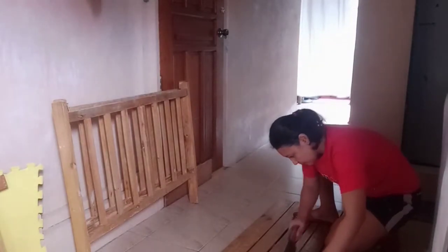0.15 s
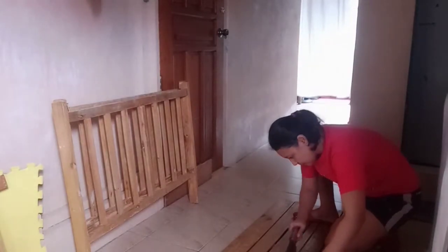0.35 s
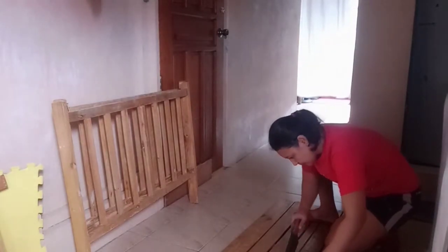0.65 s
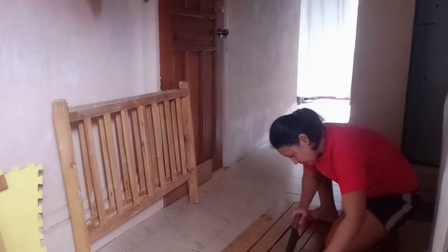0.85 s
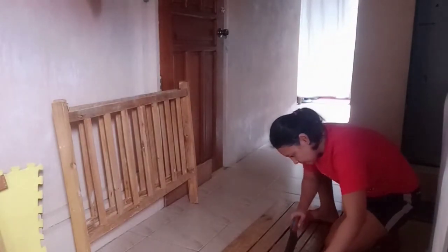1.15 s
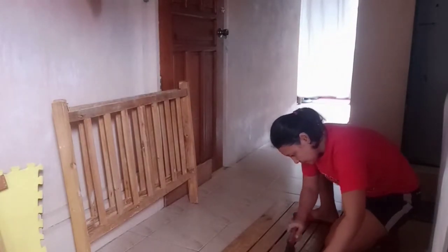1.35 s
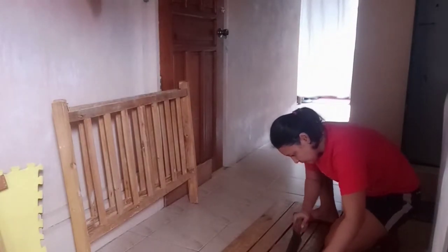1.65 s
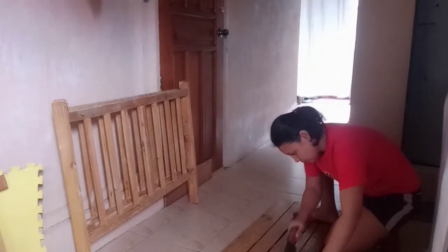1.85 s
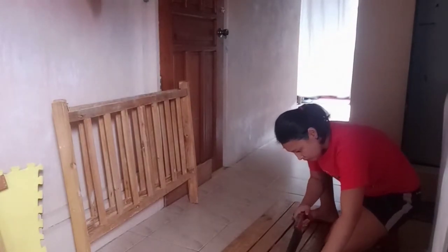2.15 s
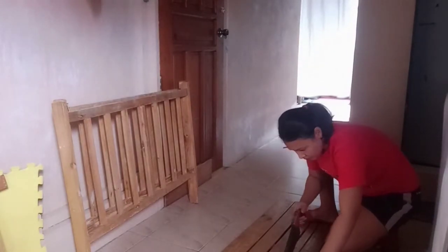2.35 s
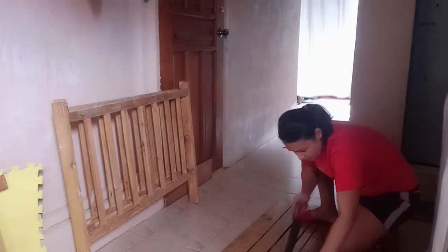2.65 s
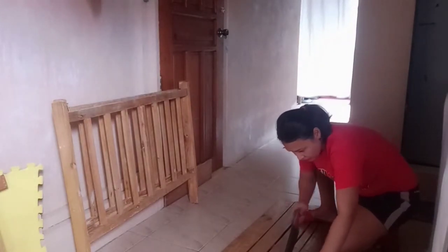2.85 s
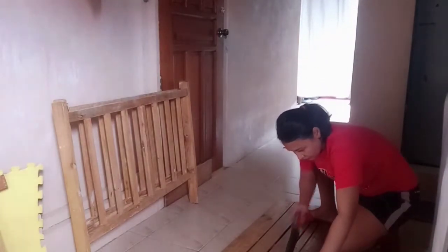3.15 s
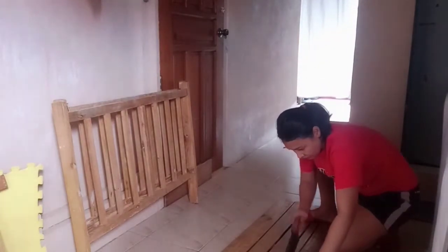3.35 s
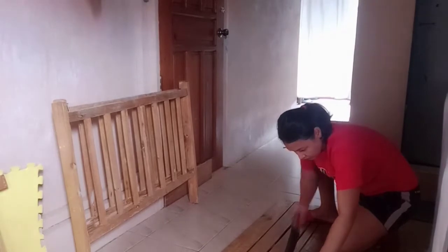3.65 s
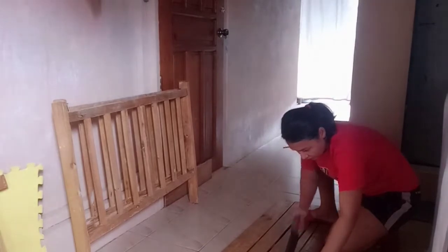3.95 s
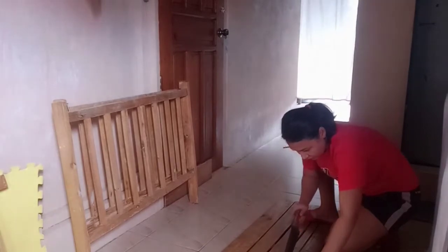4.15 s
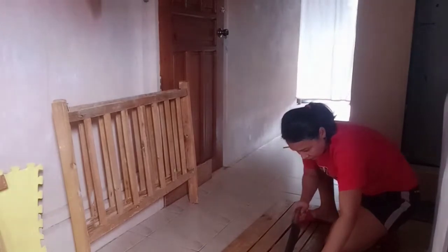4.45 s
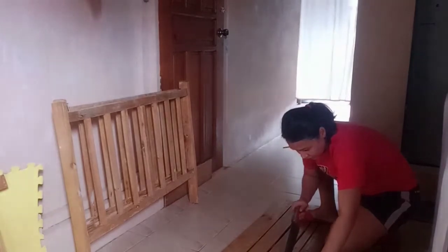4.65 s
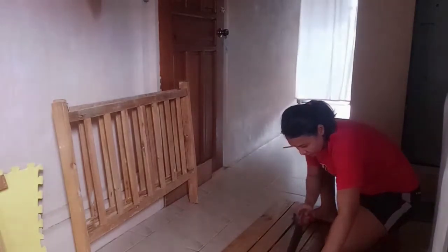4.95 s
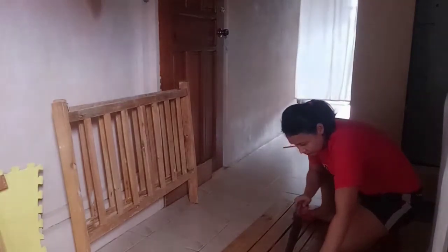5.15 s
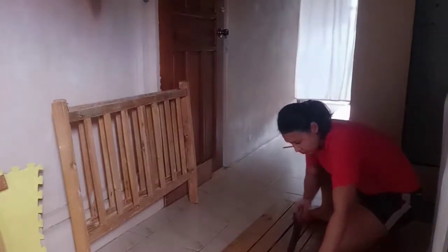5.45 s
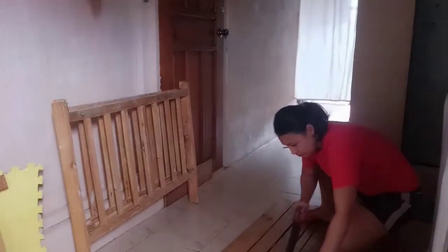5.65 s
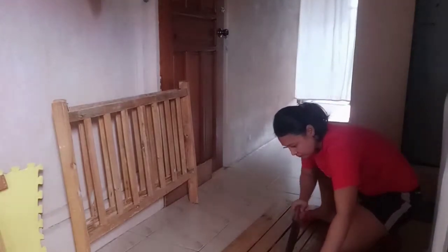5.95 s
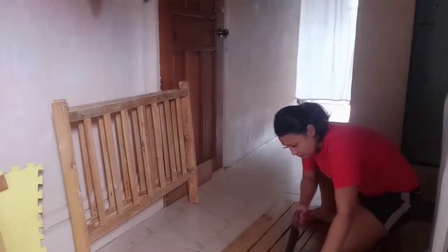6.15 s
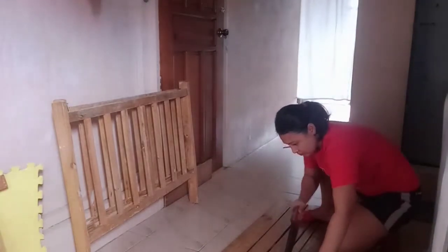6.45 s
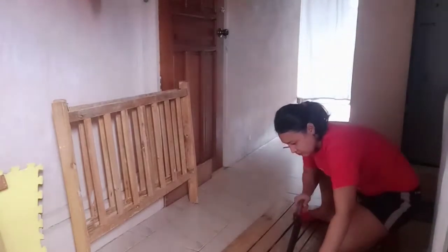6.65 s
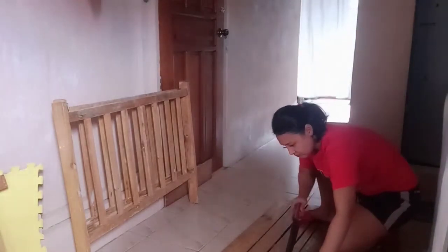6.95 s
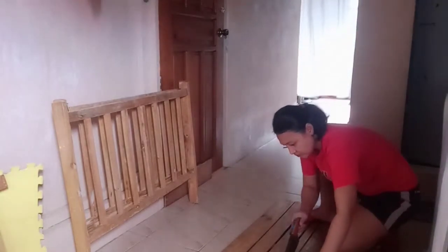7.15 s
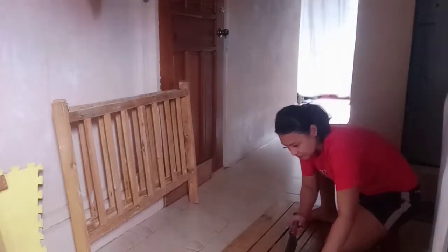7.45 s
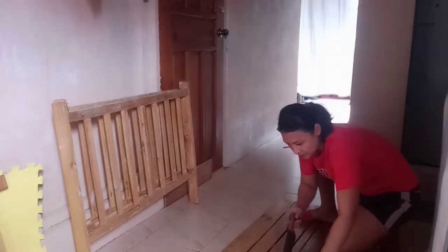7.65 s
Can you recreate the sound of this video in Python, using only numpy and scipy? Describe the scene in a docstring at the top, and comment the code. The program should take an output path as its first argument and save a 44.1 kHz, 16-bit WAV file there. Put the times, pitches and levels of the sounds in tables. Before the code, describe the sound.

Fast, dry hand sawing on wood, about six strokes a second, stops and restarts in a hard-walled hallway, ending in near silence.

```python
"""From the start a hand saw works to and fro through a wooden slat on a tiled hallway floor, about six
strokes a second, with pauses; its teeth snap fibres and shake frame, slat and blade, and echoes follow.
A draught, lumpy low noise, is there from the start, buffets the microphone hard from 1.3 to 2.7 s and dies by 3.2 s.
From 2 s narrow noise bands whistle faintly in the pauses; they are strong as the blade sings near 7.1 s.
A quiet house hushes throughout; a faint hiss is all that differs between the channels."""
import sys
import numpy as np
from scipy import signal
from scipy.fft import rfft, irfft
from scipy.io import wavfile
from scipy.ndimage import uniform_filter1d

SR = 44100
rng = np.random.default_rng(int(sys.argv[2]) if len(sys.argv) > 2 else 0)


def volts_from_db(level):
    """Convert decibel levels to linear amplitude ratios."""
    exponent = np.asarray(level, float) / 20
    return 10 ** exponent


def store_pcm(level_fs):
    """Save levels as 16-bit WAV."""
    pcm = np.round(np.clip(level_fs, -1, 1) * 32767).astype(np.int16)
    wavfile.write(sys.argv[1], SR, np.atleast_2d(pcm).T)


N = 343978
STEP_S = 0.002  # grid of the stroke envelopes


def evened(x):
    """Scales to rms 1."""
    return x / np.sqrt(np.mean(x ** 2) + 1e-20)


def curve(rows, column):
    """One column of a table, at every sample."""
    rows = np.asarray(rows)
    return np.interp(np.arange(N) / SR, rows[:, 0], rows[:, column])


def stretched(values):
    """From steps of STEP_S to samples."""
    return np.interp(np.arange(N) / SR, np.arange(len(values)) * STEP_S, values)


def wander(hz):
    """Low-passed noise of rms 1: slow chance."""
    return evened(signal.sosfilt(signal.butter(2, hz, fs=SR, output="sos"), rng.standard_normal(N)))


def body(points, band_hz, rings=()):
    """Minimum-phase response of a colour with resonances; white noise comes out at rms 1 within the band."""
    hz = np.fft.rfftfreq(8192, 1 / SR)
    point_hz, point_db = np.transpose(points)
    db = np.interp(np.log(hz + 1), np.log(point_hz + 1), point_db)
    for centre_hz, width_hz, lift_db in rings:
        db = db + lift_db / (1 + (2 * (hz - centre_hz) / width_hz) ** 2)
    # folding the cepstrum makes the response causal
    cepstrum = irfft(np.log(volts_from_db(np.maximum(db, -100))))
    cepstrum[1:4096] *= 2
    cepstrum[4097:] = 0
    response = np.exp(rfft(cepstrum))
    inside = (hz > band_hz[0]) & (hz < band_hz[1])
    return irfft(response) / np.sqrt(np.sum(abs(response[inside]) ** 2) / len(hz))


def coloured(x, points, band_hz, rings=()):
    """Filters a signal through a body."""
    return signal.oaconvolve(x, body(points, band_hz, rings))[:N]


# swells of sawing, mostly firm and lighter strokes, also faint tails and overlapping parts of strokes:
# full_force_s, swell_ms (from rest), fade_ms (by 20 dB at depth 1), force_db, scrape_db (blade re force)
STROKE_ROWS = [(0.071, 197, 96.5, -19.5, -10.5), (0.21, 119, 84.5, -22.5, -8),
               (0.377, 137, 91.5, -23, -9.5), (0.545, 191, 91, -28, -7), (0.693, 85, 114, -20, -11),
               (0.843, 99, 129, -26, -7.5), (1.004, 101, 116, -20, -11.5), (1.158, 140, 113.5, -27.0, -6.5),
               (1.342, 118, 88.5, -21, -11.5), (1.508, 152, 104.5, -26.5, -7),
               (1.624, 29, 94.5, -39.5, -2.5), (1.73, 58.5, 128, -19.5, -8.5), (1.911, 118, 112, -29.5, -5),
               (2.042, 45, 64.5, -60.5, 8), (2.208, 84, 61.5, -51.5, -2.5), (2.312, 97, 75, -59, 0),
               (2.569, 172, 86.5, -41, -3.5), (2.568, 68, 25, -41, -16.0), (2.72, 82, 138.5, -21, -6.5),
               (2.883, 71, 118.5, -26.0, -4), (3.039, 89, 118.5, -19.5, -9), (3.228, 146, 84, -24.5, -7),
               (3.361, 95, 128.5, -22.5, -6.0), (3.586, 149, 73, -28, -4), (3.694, 81, 122, -20, -7),
               (3.863, 150, 93.5, -28.5, -7.0), (4.013, 110, 96, -23, -6.5), (4.167, 114, 157.5, -29, -4),
               (4.305, 81, 90, -21.5, -6.5), (4.465, 152, 117.5, -32.0, -2.5), (4.795, 153, 57.5, -55.5, 8),
               (4.965, 64, 89, -42.5, 1.5), (5.126, 110, 101.5, -39, -3.5), (5.509, 91, 123.5, -23, -5.5),
               (5.683, 132, 82, -32.5, -5), (5.782, 71, 107, -25.5, -4.5), (5.979, 153, 101, -34.5, -3.0),
               (6.066, 64, 132.5, -24.5, -5.0), (6.204, 68, 132.5, -31, -2.5), (6.562, 140, 206, -60.5, 8),
               (6.609, 103, 87.5, -36, -3), (6.766, 118, 103.5, -21.0, -6.5),
               (6.944, 125, 110, -30.5, -3.5), (7.098, 135, 164, -25, 0), (7.194, 39, 120, -30.5, 5),
               (7.378, 28, 167, -64.5, -1), (7.578, 210, 217.5, -63, -14.5), (7.777, 27, 106.5, -70, 13)]
SWELL_POWER, FADE_POWER = 2.9, 1.43
BITE_SHARE, BITE_MS = 0.74, 2.5  # teeth bite with this share of the swell left, within BITE_MS
BITE_DB = -37  # lighter strokes slide in without biting


def strokes(offset_db=0., shift_s=0., depth=0.69, late=0.93):
    """Power of every stroke per step, and its phase: -1 at rest, 0 at full force, 1 after fade_ms."""
    full_s, swell_ms, fade_ms, force_db = np.transpose(STROKE_ROWS)[:4]
    late_ms = 1000 * (np.arange(0, N / SR, STEP_S)[:, None] - full_s - shift_s)
    phase = np.where(late_ms < 0, late_ms / np.maximum(swell_ms, 10), late_ms / np.maximum(fade_ms, 10))
    swell = np.maximum(1 - np.minimum(phase, 0) ** 2, 0) ** (depth * late * SWELL_POWER)
    since_bite_ms = late_ms + 1000 * shift_s + BITE_SHARE * swell_ms
    swell = swell * np.clip(since_bite_ms / BITE_MS, force_db < BITE_DB, 1)
    fade_db = -20 * depth * np.maximum(phase, 0) ** FADE_POWER
    return (swell * volts_from_db(force_db + offset_db + fade_db)) ** 2 + 1e-14, phase


def stroke_db(offset_db=0., shift_s=0., depth=1., late=1.):
    """Level of all strokes together: their powers add."""
    return stretched(10 * np.log10(strokes(offset_db, shift_s, depth, late)[0].sum(1)))


def teeth(per_s, spread_db, rasp, judder_db):
    """Fibres snapping at uneven moments over the rasp of dust, with the blade juddering in the cut."""
    snaps = (rng.random(N) < per_s / SR) * rng.choice([-1., 1.], N)
    snaps = snaps * volts_from_db(spread_db * np.minimum(rng.exponential(1, N), 4))
    rasp = np.clip(rasp, 0, 1)
    mix = np.sqrt(1 - rasp) * evened(snaps) + np.sqrt(rasp) * rng.standard_normal(N)
    return evened(mix * volts_from_db(judder_db * wander(54.0)))


def uneven(x, force_db, loud_db=2.0, quiet_db=7.5):
    """Random patches in time and pitch make the colour uneven, more so in quiet moments."""
    z = signal.stft(x, nperseg=1024, noverlap=768)[2]
    field = rng.standard_normal(z.T.shape).T
    field = uniform_filter1d(field, size=4, axis=0)
    field = evened(uniform_filter1d(field, size=9, axis=1))
    force_db = np.interp(np.arange(z.shape[1]) * 256, np.arange(N), force_db)
    depth_db = np.interp(force_db, [-60, -35], [quiet_db, loud_db])
    gain = volts_from_db(depth_db * field)
    gain /= np.sqrt(np.mean(gain ** 2, axis=0))
    return signal.istft(z * gain, nperseg=1024, noverlap=768)[1][:N]


FIRM_DB, FRAME_LOSS = -29.5, 0.97  # below this force, dB lost per dB
SKIM_DB, SKIM_LOSS = 1, 3.  # a blade scraping brighter than this only skims: dB lost per dB


def drumming_db():
    """Level offset per stroke: a light or skimming stroke shakes the frame less."""
    force_db, scrape_db = np.transpose(STROKE_ROWS)[3:]
    return FRAME_LOSS * np.minimum(force_db - FIRM_DB, 0) - SKIM_LOSS * np.maximum(scrape_db - SKIM_DB, 0)


# ringing of wood and steel above the broad colour, shared by frame, slat and blade: centre_hz, width_hz, lift_db
RING_ROWS = [(279.6, 75, 5), (376, 110, 1.5), (473, 93, 1.5), (696, 76, 0.5), (994, 49, 2), (1094, 21, 7.5),
             (1404, 50, 2), (1522, 23, 7.5), (1720, 33, 3), (2187, 43, -11), (2387, 82, 4), (3290, 29, 5),
             (3480, 25, 7), (3622, 30, 5.5), (3793, 42, 7), (5550, 120, 1.5), (6700, 45, -2.5),
             (7900, 120, 2.5)]
# how firmly the slat is pressed down: time_s, drumming_db (frame re force), thud_db (floor re drumming)
SEATING_ROWS = [(0.0, -7.5, -15), (.8, -7.5, -22), (1.5, -5, -15), (2.7, -7.5, -31), (3.3, -8.5, -13.5),
                (3.9, -6.5, -14.5), (4.3, -4.5, -14), (5.0, -4.5, -13), (5.5, -8.5, -13), (6.2, -6.5, -9),
                (6.7, -10, -19), (7.1, -10.5, -22.5), (7.8, -13.5, -16)]
# colour of the frame: pitch_hz, density_db (relative, per Hz)
FRAME_COLOUR = [(53, -57.5), (90, -19.5), (182, -5), (241, -10), (280, -2), (316, -8.5), (370, 3), (448, 1),
                (650, -4.5), (840, -22.5), (1430, -120)]


def frame(coarse):
    """The teeth drum the frame, lagging the stroke."""
    level_db = stroke_db(drumming_db(), shift_s=0.0085, depth=1., late=0.98) + curve(SEATING_ROWS, 1)
    return coloured(coarse * volts_from_db(level_db), FRAME_COLOUR, (230, 600), RING_ROWS)


CHATTER_HZ, LIGHT_HZ_PER_DB = 948, 19.5  # light strokes chatter higher
PUSH_DB, SAG_HZ_PER_DB = -27, 29  # firmer strokes sag in pitch as they go, lighter ones climb


def chatter_hz():
    """Pitch of the passing teeth: mean over strokes, weighted by their power."""
    power, phase = strokes()
    force_db = np.transpose(STROKE_ROWS)[3]
    sag_hz = SAG_HZ_PER_DB * np.clip(force_db - PUSH_DB, -8, 8) * np.clip(phase, -1, 1)
    hz = CHATTER_HZ + LIGHT_HZ_PER_DB * (-21.5 - force_db) - sag_hz
    return stretched((power * hz).sum(1) / power.sum(1))


def glide(x, hz, width_hz):
    """A resonance that follows the curve hz: shift down to zero, smooth, shift back."""
    turn = np.exp(2j * np.pi * np.cumsum(hz) / SR)
    r = np.exp(-np.pi * width_hz / SR)
    return 2 * (turn * signal.lfilter([1 - r], [1, -r], x / turn)).real


def chatter(coarse, force_db):
    """Passing teeth: a resonance whose pitch moves with each stroke."""
    return evened(glide(coarse, chatter_hz(), width_hz=300.)) * volts_from_db(force_db - 17.5)


# colour of the slat: pitch_hz, density_db (relative, per Hz)
SLAT_COLOUR = [(350, -41.5), (600, -11), (714, -2), (1080, -2.5), (1390, -7), (1740, -4.5), (2300, -19),
               (2990, -36), (5060, -120)]


def slat(coarse, force_db, bites):
    """Teeth and catches ring the wooden slat."""
    level = volts_from_db(force_db - 0.03) + volts_from_db(-7.0) * bites
    return coloured(coarse * level, SLAT_COLOUR, (650, 2000), RING_ROWS)


# colour of the steel blade: pitch_hz, density_db (relative, per Hz)
BLADE_COLOUR = [(1290, -25), (2200, 0), (2410, -1.5), (2590, -4), (2790, -3.5), (3700, -3), (4890, -11.5),
                (7380, -12.5), (7820, -14.5), (9220, -33), (11300, -29.5), (12700, -20), (14900, -13),
                (15800, -14)]


def blade(fine, bites):
    """Fine teeth noise rings the steel; it leads the stroke and dips less at the turns."""
    scrape_db = np.transpose(STROKE_ROWS)[4]
    scrape = volts_from_db(stroke_db(scrape_db, shift_s=-.006, depth=0.93)) + bites
    sizzle = signal.sosfilt(signal.butter(4, 11800., "high", fs=SR, output="sos"), fine)
    sizzle_gain = np.clip(scrape / 0.016, .01, 3) ** -.1 - 1  # light strokes keep more of the top
    return coloured(scrape * (fine + sizzle * sizzle_gain), BLADE_COLOUR, (2600, 8000), RING_ROWS)


# teeth catching at the start of a stroke: start_s, level_db (at onset)
CATCH_ROWS = [(.187, -55), (0.638, -48), (0.665, -41), (.926, -38), (.959, -37), (1.093, -45), (1.275, -50),
              (1.435, -52), (1.603, -45), (1.699, -48), (2.158, -54), (2.477, -53), (2.656, -29.5),
              (2.84, -44), (3, -33), (3.201, -52), (3.318, -35), (3.542, -30), (3.648, -45), (3.94, -36),
              (4.004, -53), (4.09, -44), (4.277, -53), (4.711, -68), (4.921, -70), (5.451, -48),
              (5.749, -47), (5.978, -35.5), (6.697, -50), (6.913, -45), (6.994, -30.5), (7.039, -17),
              (7.077, -24), (7.188, -32), (7.757, -69)]


def catches():
    """Envelope of tearing bursts: instant onset, 60 dB decay in 55 ms."""
    train = np.zeros(N)
    for start_s, level_db in CATCH_ROWS:
        train[round(start_s * SR)] = volts_from_db(level_db)
    t = np.arange(4000) / SR
    return signal.oaconvolve(train, volts_from_db(-60 * t / 0.055))[:N]


def saw():
    """The same teeth shake the frame, the slat and the blade, each with its own colour."""
    force_db = stroke_db()
    coarse = uneven(teeth(per_s=700., spread_db=2.0, rasp=0.47, judder_db=0.5), force_db)
    fine = uneven(teeth(per_s=2300.0, spread_db=2.5, rasp=0.61, judder_db=2.0), force_db)
    fine = evened(0.63 * coarse + 0.78 * fine)
    bites = catches()
    return frame(coarse) + chatter(coarse, force_db) + slat(coarse, force_db, bites) + blade(fine, bites)


def hallway(x, t60_low_s=0.15, t60_high_s=0.1, split_hz=2060.0):
    """Sparse echoes of random sign between hard walls; the treble dies first."""
    taps = np.zeros(SR // 2)
    at = np.arange(200, len(taps) - 20, 20)
    taps[at + rng.integers(0, 20, len(at))] = rng.choice([-1., 1.], len(at))
    low = signal.sosfilt(signal.butter(2, split_hz, fs=SR, output="sos"), taps)
    t = np.arange(len(taps)) / SR
    tail = low * volts_from_db(-60 * t / t60_low_s) + (taps - low) * volts_from_db(-60 * t / t60_high_s)
    return signal.oaconvolve(x, tail / np.linalg.norm(tail))[:N]


def thud_db():
    """Level of the floor thudding after the strokes, less for lighter ones."""
    force_db = np.transpose(STROKE_ROWS)[3]
    offset_db = drumming_db() + .4 * (force_db + 20)
    level_db = stroke_db(offset_db, shift_s=.025, depth=1.6, late=2.6)
    return level_db + curve(SEATING_ROWS, 1) + curve(SEATING_ROWS, 2)


# draught on the microphone: time_s, level_db
DRAUGHT_ROWS = [(0.0, -50), (.12, -40), (.5, -63), (.67, -47), (1.05, -38.5), (1.27, -53), (1.34, -40),
                (1.58, -31.5), (1.65, -46), (1.7, -30.5), (2.0, -35), (2.19, -52), (2.38, -43), (2.45, -51),
                (2.67, -31), (2.78, -43), (3.08, -59), (3.15, -87.5), (7.8, -79.5)]
# colour of draught and thud: pitch_hz, density_db (relative, per Hz)
GUST_COLOUR = [(15, -53.5), (25, -19.5), (60, -6), (86, 2), (140, 1), (192, -8), (260, -29.5), (340, -62.5),
               (570, -120)]


def draught_and_thud():
    """Lumpy low turbulence at the microphone port; the floor thuds in the same noise."""
    lumps = evened(volts_from_db(2.5 * wander(18.)) * rng.standard_normal(N))
    level = np.hypot(volts_from_db(curve(DRAUGHT_ROWS, 1)), volts_from_db(thud_db()))
    return coloured(lumps * level, GUST_COLOUR, (40, 170))


# colour of the quiet house: pitch_hz, density_db (relative, per Hz)
HUSH_COLOUR = [(24, -39.5), (40, -16), (162, 1.5), (440, -1), (580, -6.5), (1790, -11.5), (3680, -24),
               (5100, -23), (7240, -5), (10300, -46), (15700, -23.5)]
HUSH_DB = -68.5


def hush():
    """The quiet house: coloured noise whose level wanders."""
    patchy = rng.standard_normal(N) * volts_from_db(3.5 * wander(6.))
    return volts_from_db(HUSH_DB) * coloured(patchy, HUSH_COLOUR, (40, 15700))


# what differs between the channels: pitch_hz, density_db (relative, per Hz)
APART_COLOUR = [(35, -50), (60, -13), (276, -4), (695, -10.5), (855, -6.5), (8040, -22.5), (9450, -37.5),
                (15000, -15)]


def side_hiss():
    """A faint hiss of opposite sign in the two channels; it swells a little with the sawing."""
    level_db = -63.0 + 0.12 * np.maximum(stroke_db(), -90)
    return coloured(volts_from_db(level_db) * rng.standard_normal(N), APART_COLOUR, (60, 15000))


# single strong buffets: start_s, level_db (nominal peak), pitch_hz
BUFFET_ROWS = [(1.336, -19, 102), (1.408, -18, 172), (1.433, -20.5, 152), (1.562, -26, 116),
               (1.579, -19.5, 160), (1.608, -18, 110), (1.678, -15.5, 111), (1.788, -22, 148),
               (1.982, -21, 102), (2.001, -20, 111), (2.057, -23, 163), (2.086, -25, 105), (2.103, -28, 98),
               (2.145, -34, 127), (2.199, -45, 94.2), (2.239, -37, 70.0), (2.287, -28, 80.5),
               (2.364, -37, 115), (2.385, -28, 79), (2.489, -29.5, 99.6), (2.523, -25.5, 100),
               (2.569, -24, 84), (2.59, -24, 125), (2.65, -15, 121)]


def buffets():
    """Pushes of air on the microphone: sines of 2.6 cycles that rise and die at once."""
    out = np.zeros(N)
    for start_s, level_db, pitch_hz in BUFFET_ROWS:
        cycles = np.arange(round(2.6 * SR / pitch_hz)) * pitch_hz / SR
        push = volts_from_db(level_db) * (cycles / 0.58) * np.exp(1 - cycles / 0.49) * np.sin(2 * np.pi * cycles)
        out[round(start_s * SR):][:len(push)] += push * signal.windows.tukey(len(push), .3)
    return out


# wavering tones, faint in the pauses, strong where the blade sings: start_s, end_s, pitch_hz, width_hz, level_db
WHISTLE_ROWS = [(2.0, 2.2, 2340, 60, -70), (2.125, 2.298, 570, 60, -76), (2.296, 2.468, 2500, 60, -72),
                (4.55, 4.754, 2265, 49, -65), (4.57, 4.845, 880, 34, -71), (4.966, 5.054, 1310, 28, -53),
                (4.904, 4.965, 2900, 40, -60), (5.21, 5.336, 2300, 34, -85), (5.203, 5.44, 640, 30, -86.5),
                (5.33, 5.46, 2260, 15, -68), (5.25, 5.45, 6440, 210, -92), (6.36, 6.5, 2310, 40, -88),
                (7.444, 7.517, 1900, 60, -77.5), (7.446, 7.5, 6500, 530, -66),
                (7.556, 7.738, 6000, 190, -78), (7.05, 7.259, 3500, 220, -32),
                (7.07, 7.176, 690, 140, -25.5)]


def whistles():
    """Noise through two equal narrow resonances: fuzzy tones that come and go."""
    out = np.zeros(N)
    for start_s, end_s, pitch_hz, width_hz, level_db in WHISTLE_ROWS:
        count = round((end_s - start_s) * SR)
        peak = signal.iirpeak(pitch_hz, pitch_hz / width_hz, SR)
        fuzz = signal.lfilter(*peak, rng.standard_normal(SR // 2))
        fuzz = signal.lfilter(*peak, fuzz)[-count:]  # settled part
        out[round(start_s * SR):][:count] += volts_from_db(level_db) * evened(fuzz) * signal.windows.tukey(count, .4)
    return out


def scene():
    """Saw, its echoes, the draught and the quiet house; the channels differ only faintly."""
    cut = saw()
    mid = cut + volts_from_db(-11.5) * hallway(cut) + draught_and_thud() + buffets() + hush() + whistles()
    side = side_hiss()
    return np.array([mid + side, mid - side])


def low_pass(x):
    """Removes everything above the highest recorded frequency."""
    return signal.sosfilt(signal.butter(12, 16810, fs=SR, output="sos"), x)


def record(dry):
    """Low cut, soft overload and band limit of the recorder."""
    low_cut = signal.sosfilt(signal.butter(2, 45., "high", fs=SR, output="sos"), dry)
    ceiling = 0.45
    rounded = ceiling * np.tanh(low_cut / ceiling)
    band_limit = signal.firwin(511, 15620, window=("kaiser", 9), fs=SR)
    limited = signal.oaconvolve(rounded, band_limit[None], "same")
    return low_pass(limited)


dry = scene()
out = record(dry)
store_pcm(out)
```